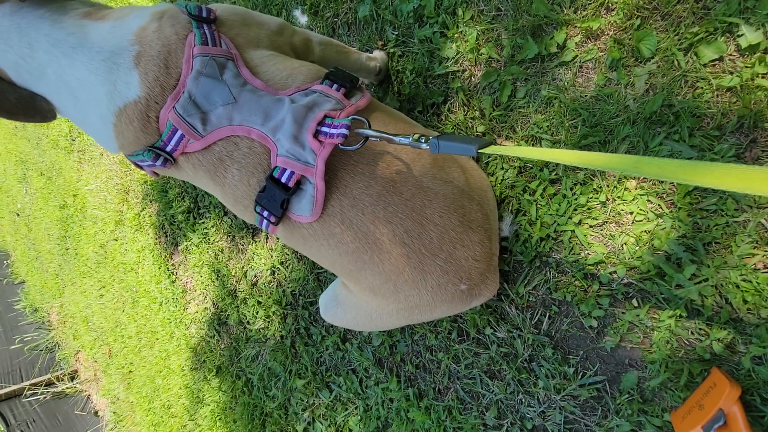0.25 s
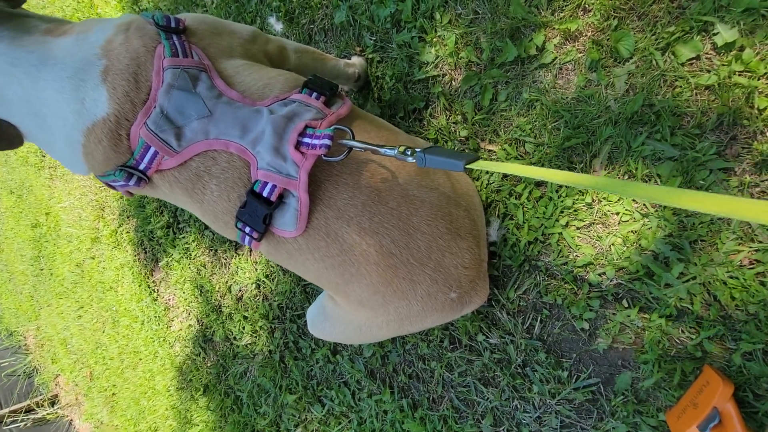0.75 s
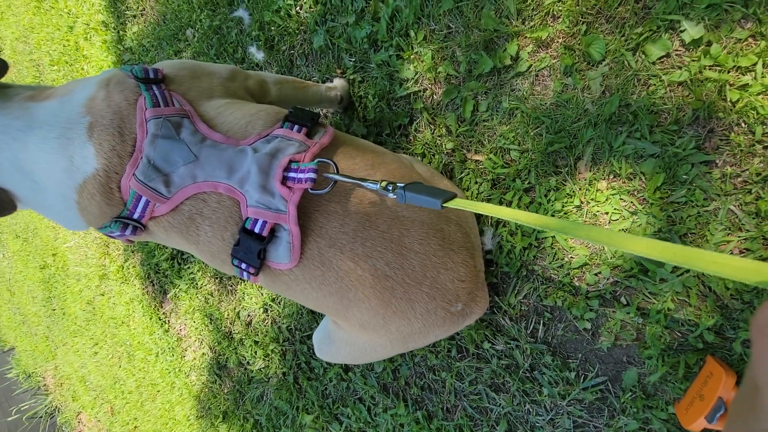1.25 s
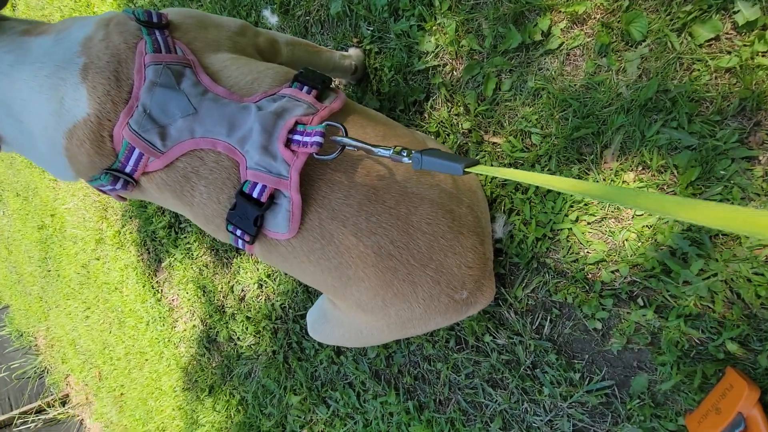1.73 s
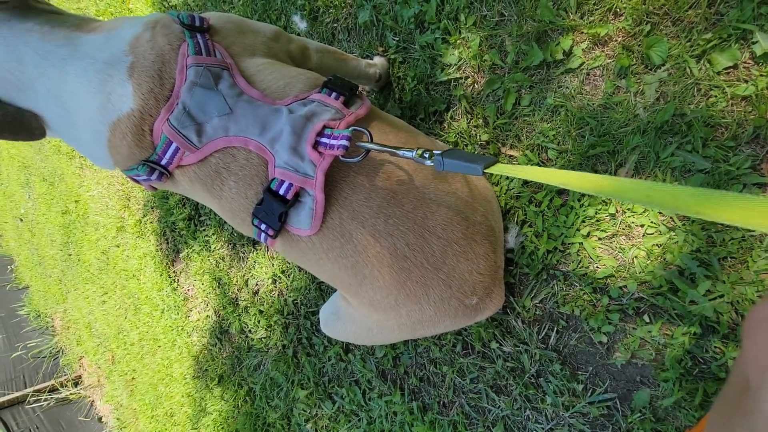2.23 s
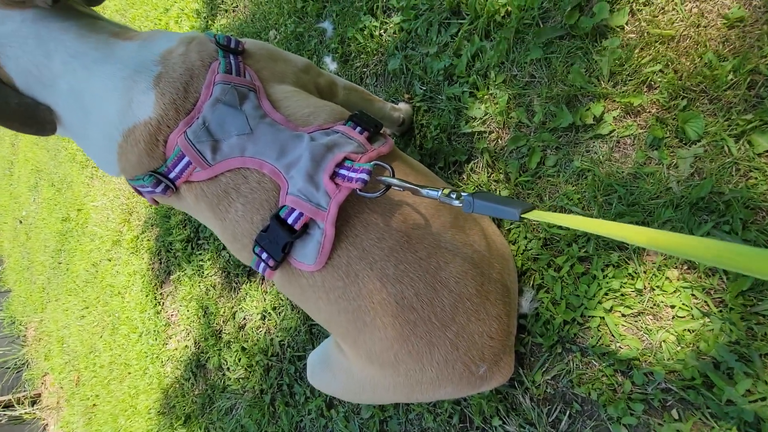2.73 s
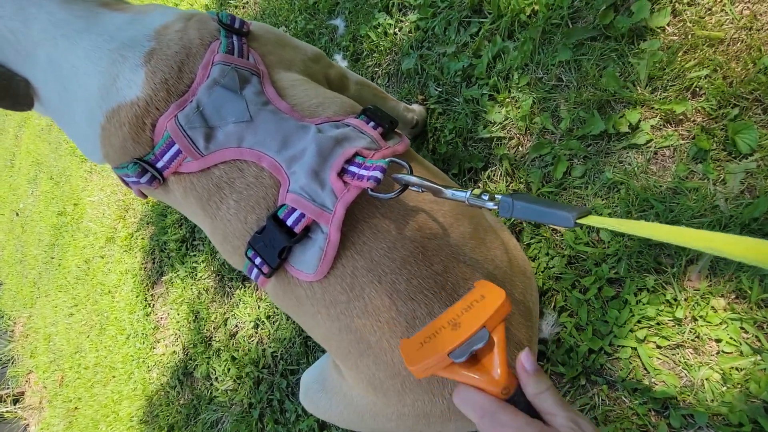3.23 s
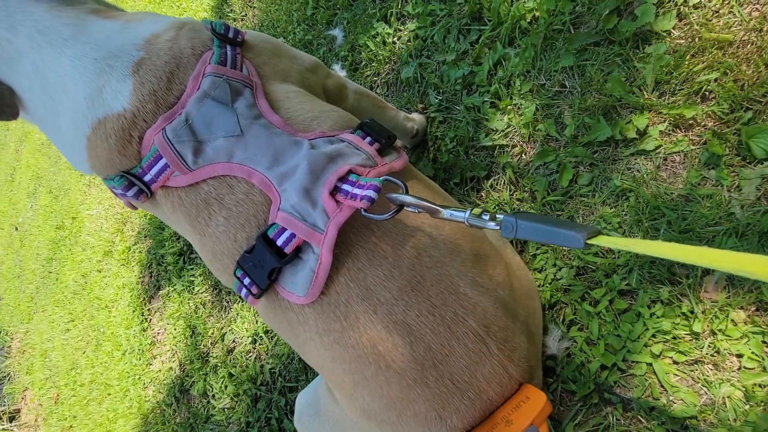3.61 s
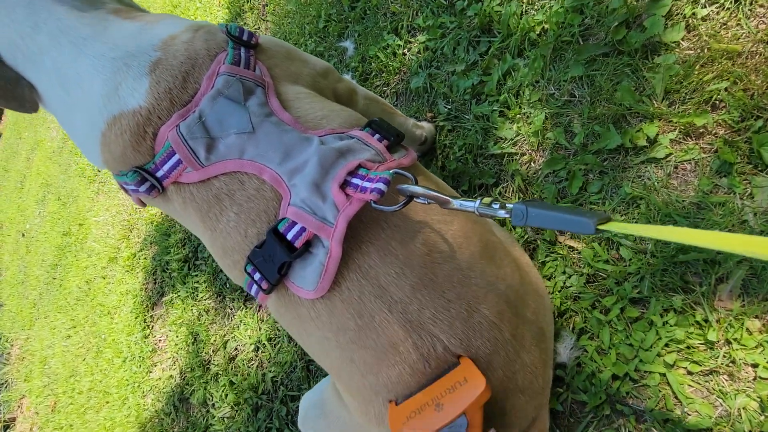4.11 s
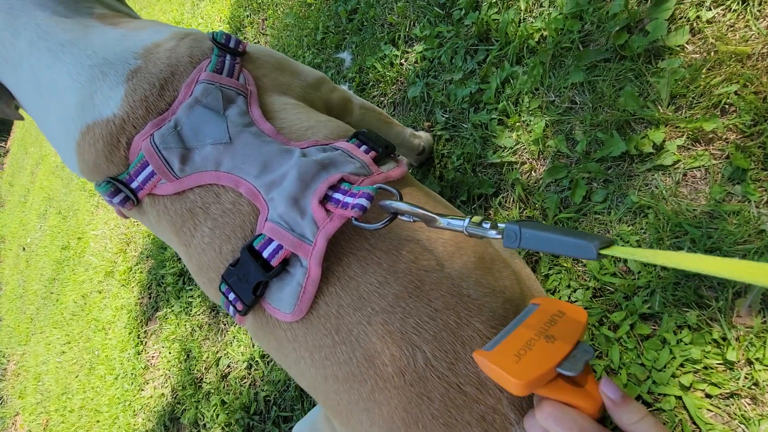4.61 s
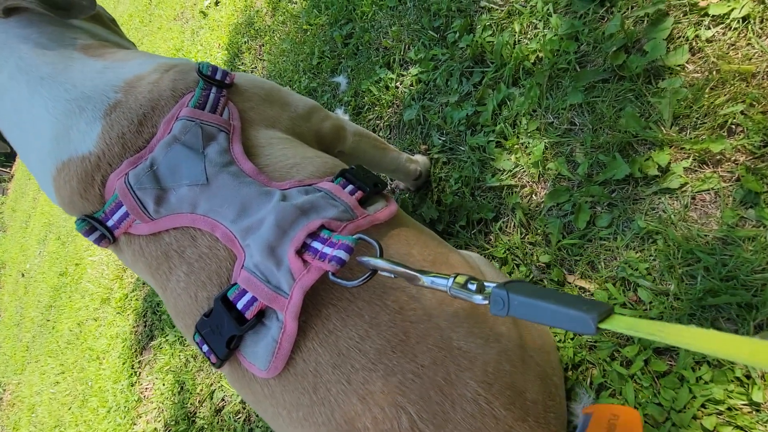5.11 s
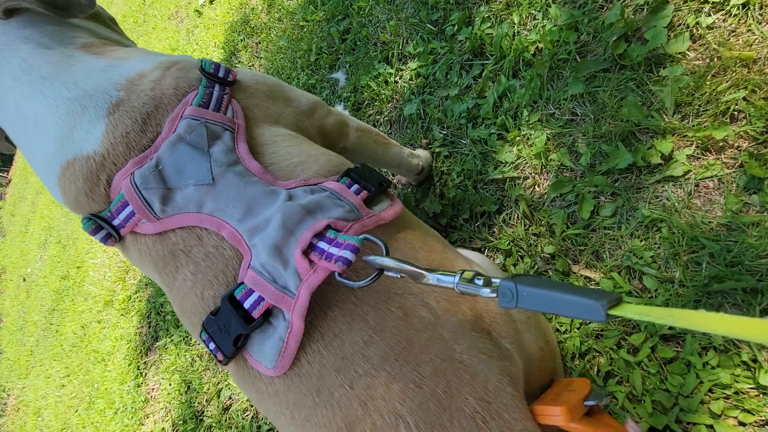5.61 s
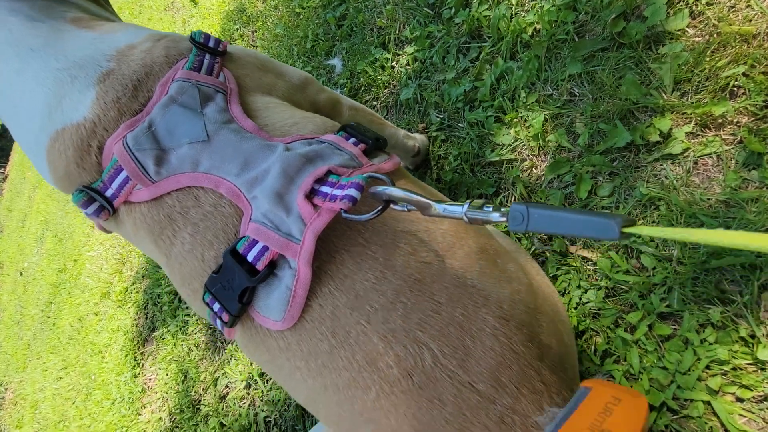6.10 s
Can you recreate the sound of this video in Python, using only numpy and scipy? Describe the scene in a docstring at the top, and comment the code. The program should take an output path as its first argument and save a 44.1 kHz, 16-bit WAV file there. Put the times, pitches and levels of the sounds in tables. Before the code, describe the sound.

Light harness ticks and soft finger rubs sound close to a hand-held stereo microphone outdoors, followed by one sharp, thumping knock on its case. Then a steel-toothed brush is drawn repeatedly through a dog's short fur, each brief stroke a dry hiss with a plastic rasp. Low gusts, far traffic, a distant droning engine and faint chirps fill the garden throughout.

```python
"""Brushing a dog on a lawn

Close under a hand-held camera's stereo microphone, a deshedding brush runs through a short coat.
Its steel comb plucks hairs, which hiss and make the plastic head rasp. The harness ticks nearby;
right at the microphone, fingers rub the case and knock it once. A breeze gusts low beneath it all.
Far off are a rumble of traffic, a wavering engine, a steady hum and small birds."""
import sys
import numpy as np
from scipy import signal
from scipy.fft import rfft, irfft
from scipy.io import wavfile
from scipy.ndimage import uniform_filter1d

SR = 44100
rng = np.random.default_rng(int(sys.argv[2]) if len(sys.argv) > 2 else 0)


def dump(signal):
    """Clip the signal to [-1, 1] and save it as 16-bit WAV at the path in sys.argv[1]."""
    limited = np.clip(np.atleast_2d(signal).T, -1, 1)
    pcm = np.round(limited * 32767).astype(np.int16)
    wavfile.write(sys.argv[1], SR, pcm)


N = 280035
TIME = np.arange(N) / SR
BINS = np.fft.rfftfreq(N, 1 / SR)


def gain_of(db):
    """Decibels to gain."""
    return 10 ** (np.asarray(db) / 20)

def unit_rms(x):
    """Scales to rms 1; a stereo pair by its middle."""
    return x / np.sqrt(np.mean(np.atleast_2d(x).mean(0) ** 2) + 1e-20)

def spectrum_at(points, hz):
    """Reads a spectrum on a log-frequency axis."""
    f, value = np.transpose(points)
    return np.interp(np.log(hz + 1), np.log(f + 1), value)

def follow(rows, t=TIME):
    """Each column of a curve at the times t."""
    s, *columns = np.transpose(rows)
    return [np.interp(t, s, column) for column in columns]

def colour(x, gain):
    """Filters by a gain for each frequency."""
    return irfft(rfft(x) * gain, N)

def drift(hz):
    """A random wander of rms 1, up to about the given rate."""
    return unit_rms(colour(rng.standard_normal(N), np.exp(-(BINS / hz) ** 2)))

def patches(shape, bins, frames):
    """A random field of rms 1, smooth over frequency and time."""
    field = uniform_filter1d(rng.standard_normal(shape), size=bins, axis=-2)
    field = uniform_filter1d(field, size=frames, axis=-1)
    return field / field.std()

def pan(db):
    """Left and right gains for a level difference; positive is left."""
    gains = gain_of([[db / 2], [-db / 2]])
    return gains / gains.mean()

def add(mix, s, sound):
    """Mixes a sound in at s seconds."""
    part = mix[:, round(s * SR):][:, :sound.shape[-1]]
    part += sound[..., :part.shape[1]]

def plucks(per_s, spread_db):
    """Tiny snaps of uneven size, different in each channel."""
    size = gain_of(spread_db * np.minimum(rng.exponential(1, (2, N)), 4))
    return unit_rms(size * rng.standard_normal((2, N)) * (rng.random((2, N)) < per_s / SR))

def movement(t, length, rise, release):
    """Speed of a hand, 0 to 1, at t seconds from its start: it gathers, holds and dies away."""
    return (1 + np.tanh(t / (2 * rise))) / 2 * (1 + np.tanh((length - t) / (2 * release))) / 2


# Open air over the lawn: f/Hz, relative density/dB
AIR_SPECTRUM = [(22, -26), (40, -3), (58, 3.5), (80, -5.5), (110, -2.5), (180, -10), (250, -17.5),
                (320, -19), (450, -29.5), (600, -35), (800, -35.5), (1250, -33.5), (1900, -39.5),
                (3300, -42), (8000, -55.5), (15500, -60.5)]
# How alike the air is in the two channels: f/Hz, correlation/-1..1
AIR_LIKENESS = [(60, 0.94), (150, .91), (300, 0.7), (640, 0.25), (1400, -.05), (3100, -0.15), (7000, 0)]
# The air leans to the right: f/Hz, left-right/dB
AIR_BALANCE = [(60, -1), (130, -0.5), (290, -5), (640, -2.5), (1400, -3), (3100, -2), (7000, -1.5),
               (15000, -0.5)]
# Far traffic swells: t/s, relative level/dB
TRAFFIC_SWELL = [(0, -0.5), (1.7, -2), (2.5, 1), (5.0, 3), (5.7, 5.5), (6.35, 4.5)]
# How strongly each band follows that swell: f/Hz, weight
SWELL_WEIGHT = [(120, 0), (180, 0.73), (270, 0.96), (600, 0.53), (1200, 0.74), (2000, 1.74),
                (3100, 0.53), (5000, 1.28), (9000, 0)]
# The breeze at the microphone dies down: t/s, gain on the deepest rumble/dB
BREEZE = [(0, -5.5), (2.2, -1.5), (3, -13), (5.2, -8), (6.35, -20)]
# Gusts on top of it: t/s, half length/s, gain on the deepest rumble/dB
GUSTS = [(1.11, 0.18, 18.6), (1.66, 0.095, 14), (3.75, 0.068, 14), (5.1, .1, 11)]

def traffic_and_breeze(air_db=-43.5, breeze_hz=55, patch_db=1.59):
    """Far traffic rumbles and roars in drifting patches, with the breeze beneath."""
    framing = dict(fs=SR, nperseg=2048, noverlap=1536)
    hz, t, (left, other) = signal.stft(rng.standard_normal((2, N)), **framing)
    likeness = spectrum_at(AIR_LIKENESS, hz)[:, None]
    right = likeness * left + np.sqrt(1 - likeness ** 2) * other
    air = np.array([left, right]) / np.sqrt(2 + likeness)
    side_db = np.outer([.5, -.5], spectrum_at(AIR_BALANCE, hz))
    air *= gain_of(spectrum_at(AIR_SPECTRUM, hz) + side_db)[:, :, None]
    still_rms = signal.istft(air, **framing)[1].mean(0).std()
    swell_db = np.outer(spectrum_at(SWELL_WEIGHT, hz), follow(TRAFFIC_SWELL, t)[0])
    gust_db = sum(db * np.exp(-((t - s) / half) ** 2) for s, half, db in GUSTS)
    wind_db = np.outer(np.exp(-(hz / breeze_hz) ** 2), follow(BREEZE, t)[0] + gust_db)
    mottle_db = patch_db * patches(left.shape, bins=16, frames=10)
    air *= gain_of(air_db + swell_db + wind_db + mottle_db) / still_rms
    return signal.istft(air, **framing)[1][:, :N]


# An engine in the distance: t/s, firing f/Hz, relative level/dB
FAR_ENGINE = [(0, 110, -54), (.9, 112, -50.5), (1.5, 135, -63), (2.18, 157, -43.5), (2.45, 148, -47.5),
              (2.85, 155, -40.5), (3.15, 143, -51.5), (3.55, 149, -47), (4.3, 145, -45.5), (4.6, 138, -61),
              (5.6, 112, -52), (6.35, 112, -59)]
# A far machine humming on one note: t/s, relative level/dB
FAR_HUM = [(0, -59), (2, -55), (4.2, -56.5), (4.6, -48.5), (5.1, -60), (5.7, -50.5), (6.35, -54)]

def machines(hum_hz=218.2, engine_db=-1, hum_db=-2, fade_db=2):
    """Two far drones fade and waver on their way through the air."""
    firing_hz, engine_level = follow(FAR_ENGINE)
    hum_level, = follow(FAR_HUM)
    engine = (firing_hz + 2.44 * drift(hz=11.5), engine_level + engine_db)
    hum = (hum_hz + 2.24 * drift(hz=7.65), hum_level + hum_db)
    out = np.zeros(N)
    for hz, db in (engine, hum):
        tone = np.sqrt(2) * np.sin(2 * np.pi * np.cumsum(hz) / SR)
        out += tone * gain_of(db + fade_db * drift(hz=10.4))
    return out * pan(db=-1.5)


# One far bird repeats a clean falling whistle: t/s, relative level/dB
WHISTLES = [(2.906, -59), (3.356, -59)]
# Thin high calls from other birds: t/s, length/s, start f/Hz, end f/Hz, relative level/dB
HIGH_CALLS = [(0, .12, 3780, 3760, -72), (.19, .075, 6830, 7200, -68), (.505, 0.097, 6450, 7950, -64.5),
              (1.698, 0.066, 6960, 7120, -71), (2.714, .054, 6950, 6550, -71),
              (6.301, .05, 6900, 7100, -68)]
# Buzzy chirps from the trees: t/s, length/s, start f/Hz, end f/Hz, relative level/dB
CHIRPS = [(.78, 0.16, 4300, 4240, -68), (.917, .05, 4500, 5200, -64.5), (.945, 0.12, 6000, 5400, -71),
          (1.042, .038, 5010, 3980, -62), (1.084, 0.048, 3350, 2800, -62),
          (1.467, 0.065, 3050, 3360, -66.5), (1.939, .14, 3230, 3050, -70), (2.149, .13, 3420, 2980, -65.5),
          (2.64, 0.095, 3000, 3420, -66.5), (2.87, .03, 3300, 3050, -67), (3.087, 0.13, 2950, 3530, -67.5),
          (3.319, 0.033, 3300, 3080, -70), (3.52, 0.046, 3150, 3060, -55), (5.583, .043, 4350, 4150, -58),
          (5.639, 0.045, 3480, 2970, -55.5), (5.955, 0.053, 4500, 4230, -56.5),
          (6.024, 0.37, 4300, 4200, -64)]

def birds(whistle_s=.09, whistle_hz=(2760, 2244), t60=0.51, wet_db=1, level_db=-2, flicker_db=1.2):
    """Far notes glide to their end pitch, some buzzy, and are scattered by trees and walls."""
    song, flutter = np.zeros((1, N)), drift(hz=364)
    whistles = [(s, whistle_s, *whistle_hz, db) for s, db in WHISTLES]
    for notes, settle, buzz_hz in ((whistles, 4, 16), (HIGH_CALLS, 2.6, 89), (CHIRPS, .6, 182)):
        for s, length, start_hz, end_hz, db in notes:
            n = int(length * SR)
            glide = np.expm1(-settle * np.linspace(0, 1, n)) / np.expm1(-settle)
            buzz = buzz_hz * np.roll(flutter, -int(s * SR))[:n]
            hz = start_hz + (end_hz - start_hz) * glide + buzz
            note = signal.windows.tukey(n, .4) * np.sin(2 * np.pi * np.cumsum(hz) / SR)
            add(song, s, gain_of(db) * note)
    song *= gain_of(flicker_db * drift(hz=45))
    t = np.arange(SR // 2) / SR
    tail = rng.standard_normal((2, len(t))) * gain_of(-60 * t / t60)
    echo = signal.fftconvolve(song, tail / np.linalg.norm(tail[0]), axes=1)[:, :N]
    return gain_of(level_db) * (song + gain_of(wet_db) * echo) * pan(db=-4)


# Fingers slide on the camera, beside the right microphone: t/s, length/s, level/dB
FINGER_RUBS = [(0.197, 0.072, -70), (0.534, .12, -66.5), (0.669, .055, -61.5), (1.249, 0.073, -65.5),
               (1.336, 0.13, -72.5), (1.6, .03, -71), (1.67, .14, -75.5), (1.919, 0.087, -51),
               (2.167, 0.043, -67), (2.227, 0.062, -63), (2.328, 0.064, -67.5), (2.42, 0.074, -72.5),
               (2.935, 0.1, -70), (5.314, .1, -69.5)]
# Skin sliding slowly on the case: f/Hz, relative density/dB
SLOW_RUB = [(300, -5), (1000, 2), (3200, 9), (5500, 7), (8000, 3), (12000, 3.5), (15500, 3.5)]
# Skin sliding fast on the case: f/Hz, relative density/dB
FAST_RUB = [(300, -17), (2500, -43), (3100, -4), (4900, -28), (5800, -3), (10000, -1), (13000, 4),
            (15500, 6.5)]

def fingers(fast_above_db=-57, grip_db=0.25, start_s=0.0042, stop_s=.008):
    """Skin rubs the case; a fast slide is a thinner, higher hiss."""
    speed = sum(gain_of(db) * movement(TIME - s, length, start_s, stop_s)
                for s, length, db in FINGER_RUBS)
    level_db = 20 * np.log10(speed + 1e-9)
    fast_share = 1 / (1 + gain_of(3.1 * (fast_above_db - level_db)))
    grain = plucks(per_s=12000, spread_db=2)
    dull = unit_rms(colour(grain, gain_of(spectrum_at(SLOW_RUB, BINS))))
    thin = unit_rms(colour(grain, gain_of(spectrum_at(FAST_RUB, BINS))))
    rub = (1 - fast_share) * dull + fast_share * thin
    return rub * gain_of(level_db + grip_db * drift(hz=90)) * pan(db=-9.5)


# Damped swings of the case around the microphone: f/Hz, relative level/dB, rise/s, left-right/dB
CASE_MODES = [(86, 1.5, 0.0082, -10), (190, -16, 0.0038, -20), (380, -14, 0.003, -17)]
# The fingertip's hard contact on the case: f/Hz, relative density/dB
CONTACT_SPECTRUM = [(100, 2.5), (480, 7), (720, 0.5), (1100, 0.5), (1800, -4), (3000, -18), (5000, -26.5),
                    (8000, -36), (15000, -36)]

def camera_knock(at_s=2.4792, level_db=-18.5, click_delay_s=0.0008):
    """A fingertip clicks on the case, whose thump the hand stops within two swings."""
    out, t = np.zeros((2, N)), np.arange(4096) / SR
    for k, (hz, db, rise, side_db) in enumerate(CASE_MODES):
        envelope = (t / rise * np.exp(1 - t / rise)) ** 3
        swing = envelope * np.sin(2 * np.pi * hz * (rise - t))
        # neighbouring modes move the microphone in opposite directions
        add(out, at_s, (-1) ** k * gain_of(db) * pan(side_db) * swing)
    f = abs(np.fft.fftfreq(len(t), 1 / SR))
    log_gain = np.log(gain_of(spectrum_at(CONTACT_SPECTRUM, f)))
    click = np.fft.ifft(np.exp(np.conj(signal.hilbert(log_gain)))).real  # minimum phase: sharp onset
    add(out, at_s + click_delay_s, -pan(db=-7) * click / abs(click).max())
    return gain_of(level_db) * out


# Harness and leash tick and scuff nearby: t/s, peak level/dB, decay/s, centre f/Hz, left-right/dB
HARNESS_TICKS = [(0.252, -43.5, 0.0016, 6000, -11), (0.36, -55, 0.0014, 5900, -13),
                 (0.477, -51, 0.0009, 4430, -13), (0.558, -41, 0.0013, 3800, -4),
                 (0.5827, -39, 0.00075, 3020, -13), (0.601, -43, 0.0042, 403, -9),
                 (0.716, -50, 0.0033, 7000, -8), (1.1887, -37.5, 0.0038, 3450, 1),
                 (1.1943, -37, 0.00075, 8500, -7), (1.195, -40, 0.0058, 520, -11),
                 (1.211, -46, 0.0098, 1140, -4), (1.275, -41.5, 0.0035, 510, -3),
                 (2.4648, -48.5, 0.0027, 2980, -4), (5.986, -42.5, 0.0041, 11100, 0)]

def harness(q=1.27, crossfeed=0.17):
    """Each tick is a short burst of friction in one broad resonance."""
    out, t = np.zeros((2, N)), np.arange(2048) / SR
    f = np.fft.rfftfreq(len(t), 1 / SR) + 1
    for s, db, decay, hz, side_db in HARNESS_TICKS:
        burst = rng.standard_normal((2, len(t))) * np.exp(-t / decay) * (1 - np.exp(-2 * t / decay))
        resonance = 1 / (1 + 1j * q * (f / hz - hz / f))
        lowpass = 1 / (1 + .3j * f / hz)
        tick = irfft(rfft(burst + crossfeed * burst[::-1]) * resonance * lowpass)
        add(out, s, gain_of(db) * pan(side_db) * tick / abs(tick.mean(0)).max())
    return out


# Brush strokes close under the microphone: t/s, length/s, rise/s, lead of the bite/s,
# easing off/(dB/s), relative rasp level/dB, relative hiss level/dB,
# first and last depth of the teeth (-1 skimming the tips .. 1 down to the skin)
BRUSH_STROKES = [(3.479, 0.22, 0.012, 0.0036, 3, -52, -54, -0.33, -0.19),
                 (3.879, 0.12, 0.022, 0.013, 4, -61, -62, -0.14, -0.077),
                 (4.156, 0.22, 0.012, 0.0064, 30, -44.5, -49, .7, -.1),
                 (4.56, .045, .025, 0, 0, -78, -66.5, -0.094, 0),
                 (4.745, .015, .004, 0, 0, -75, -67, -.5, -.5),
                 (4.849, .14, 0.032, 0.024, 8, -53.5, -53.5, -0.41, -.8),
                 (5.658, .25, 0.063, .14, 8, -60, -55.5, -.7, -0.34),
                 (5.895, .025, 0.0056, 0, 0, -66, -55, -0.83, -.9),
                 (6.068, 0.019, .015, 0.0034, 0, -59, -53.5, -.4, -.4),
                 (6.33, 0.072, .014, 0.0044, 0, -54.5, -54.5, -.4, -.4)]
# The teeth snag in a tuft and pull free: t/s, extra rasp/dB
SNAGS = [(4.17, 3.5), (4.872, 4.8), (4.985, 2.5)]

def strokes(bite_s=0.0059, lift_s=0.027, slip_db_per_s=7.5, snag_s=0.011, snag_hiss_share=0.35):
    """The comb bites, slips and lifts off: gives strength of bite, strength of slide and depth."""
    bite, slide, depth = np.zeros((3, N))
    for s, length, rise, lead, ease_db_per_s, rasp_db, hiss_db, first, last in BRUSH_STROKES:
        t = TIME - s
        held = np.clip(t, 0, length)
        grip = gain_of(rasp_db - (ease_db_per_s + slip_db_per_s) * held)
        bite += movement(t + lead, length + lead, bite_s, lift_s) * grip
        slide += movement(t, length, rise, lift_s) * gain_of(hiss_db - ease_db_per_s * held)
        depth = np.where(t > -lead - 2 * rise, first + (last - first) * held / length, depth)
    snag_db = sum(db * np.exp(-((TIME - s) / snag_s) ** 2) for s, db in SNAGS)
    return bite * gain_of(snag_db), slide * gain_of(snag_hiss_share * snag_db), depth


# The brush's plastic head, heard close: f/Hz, width/Hz, relative level/dB, extra at full depth/dB
HEAD_MODES = [(947, 150, -7, 10), (1365, 410, -1, 0), (1674, 570, 1, -4.5), (2050, 140, -16, 0),
              (2430, 300, -6.5, -2), (3130, 350, -8.5, -0.5), (4250, 410, -12, -5)]

def head_rasp(depth, rock_db=2, crossfeed=0.22):
    """Plucks on the teeth ring the head; its lowest mode shakes most when they run deep."""
    teeth = plucks(per_s=2400, spread_db=1.1)
    teeth = teeth + crossfeed * teeth[::-1]
    rasp = np.zeros((2, N))
    for hz, width, db, deep_db in HEAD_MODES:
        ring = colour(teeth, 1 / (1 + 2j * (BINS - hz) / width) ** 2)
        # the head rocks in the hand, so its resonances come and go
        rasp += ring * gain_of(db + deep_db * depth + rock_db * drift(hz=11))
    return unit_rms(rasp)


# Hair sliding through the steel teeth, heard close: f/Hz, relative density/dB
HAIR_SPECTRUM = [(500, -29), (1500, 4), (3500, 2), (5100, 4), (6600, 0), (7500, 2.5), (9000, 2.5),
                 (10500, 0.5), (13000, 2.5), (15500, 2.5)]

def hair_hiss(depth, streak_db=2.5, bright_db=4.5):
    """Thousands of hairs a second slip off the teeth and merge into a hiss."""
    hairs = colour(plucks(per_s=6500, spread_db=0), gain_of(spectrum_at(HAIR_SPECTRUM, BINS)))
    hz, t, bands = signal.stft(hairs, SR, nperseg=512)
    # each tuft has its own stiffness and leaves a short streak of colour
    streaks = streak_db * patches(bands.shape, bins=4, frames=9)
    # the fine tips of the hairs hiss higher than their roots
    tilt = bright_db * np.outer(np.clip(hz / 8000 - 1, 0, 1), -np.interp(t, TIME, depth))
    return unit_rms(signal.istft(bands * gain_of(streaks + tilt), SR, nperseg=512)[1][:, :N])

def brush(rasp_db=-1, hiss_db=0.5, rasp_tuft_db=0.85, hiss_tuft_db=0.72):
    """Hairs let go in tufts; they hiss as the comb slides and shake the head when it bites."""
    bite, slide, depth = strokes()
    tufts = drift(hz=90)
    rasp = head_rasp(depth) * bite * gain_of(rasp_db + rasp_tuft_db * tufts)
    hiss = hair_hiss(depth) * slide * gain_of(hiss_db + hiss_tuft_db * tufts)
    return rasp * pan(db=-1.5) + hiss * pan(db=-1.1)


def scene():
    """The brushing and handling up close, and the garden around them."""
    return brush() + fingers() + harness() + camera_knock() + birds() + traffic_and_breeze() + machines()

def record(dry, port_hz=3020, port_width_hz=360, port_db=3.24, edge_hz=15900):
    """The microphone port rings, then the recorder cuts the highest treble."""
    port = 1 + (gain_of(port_db) - 1) / (1 + 2j * (BINS - port_hz) / port_width_hz)
    lowpass = signal.firwin(511, edge_hz, window=("kaiser", 9), fs=SR)
    return signal.oaconvolve(colour(dry, port), lowpass[None], "same")


dry = scene()
out = record(dry)
dump(out)
```